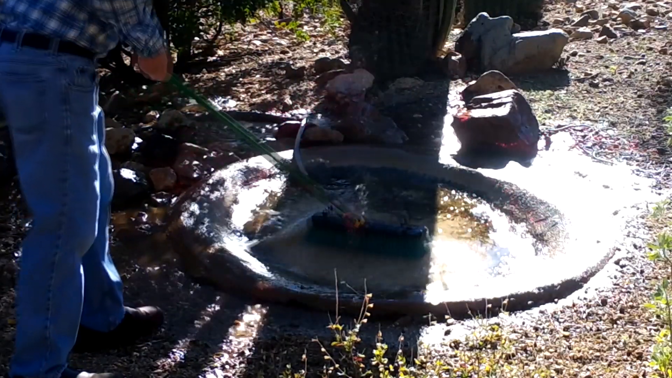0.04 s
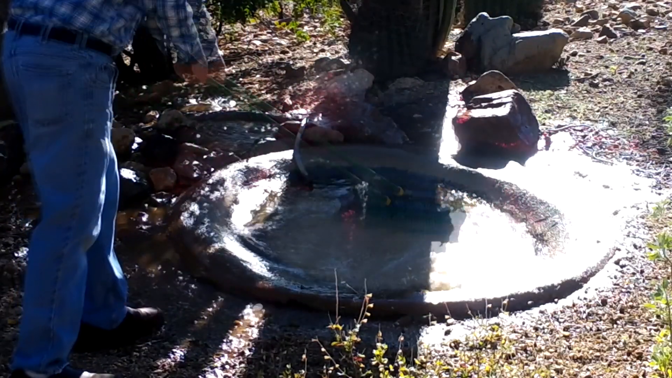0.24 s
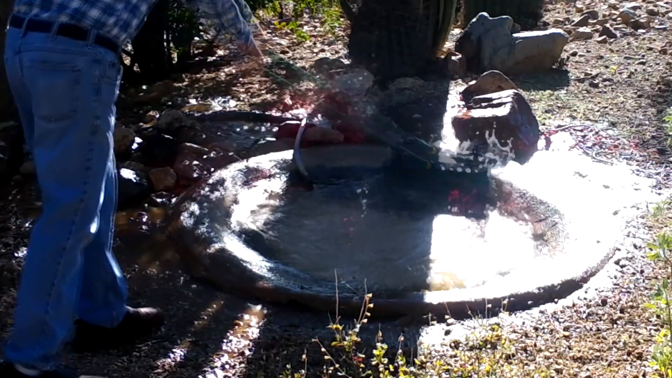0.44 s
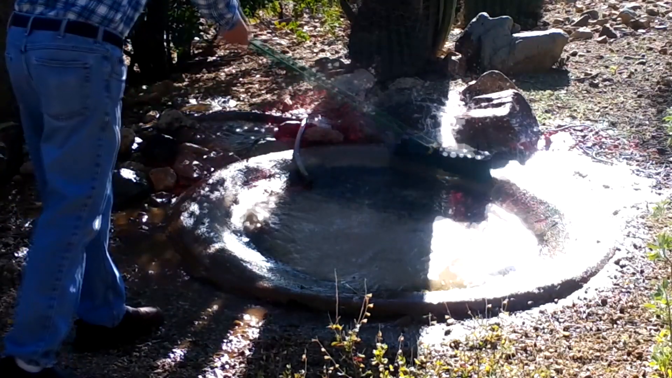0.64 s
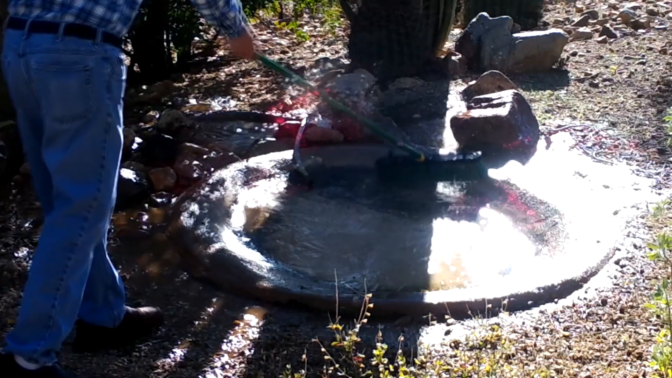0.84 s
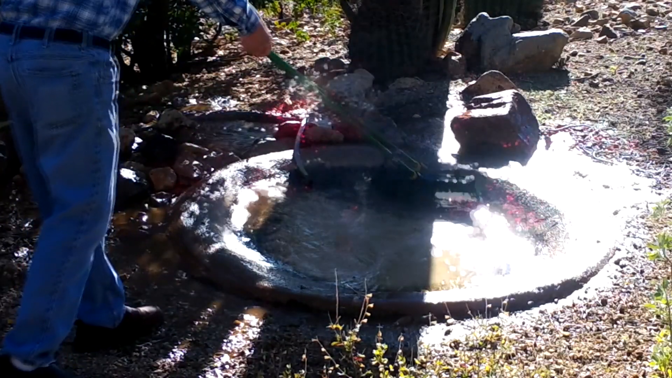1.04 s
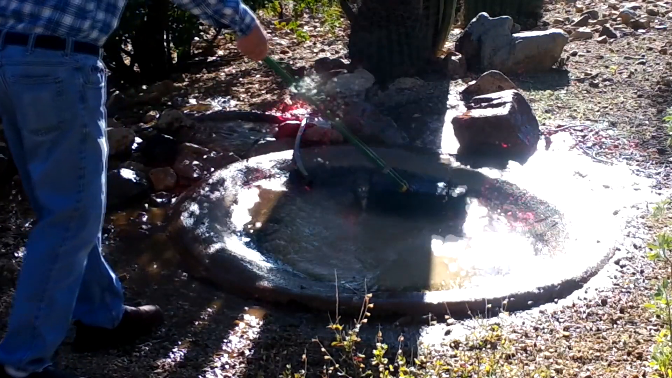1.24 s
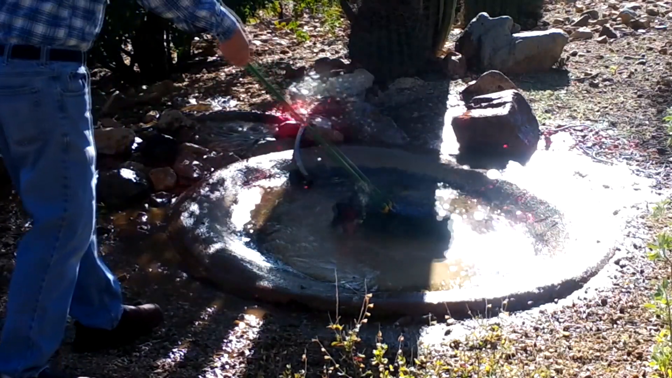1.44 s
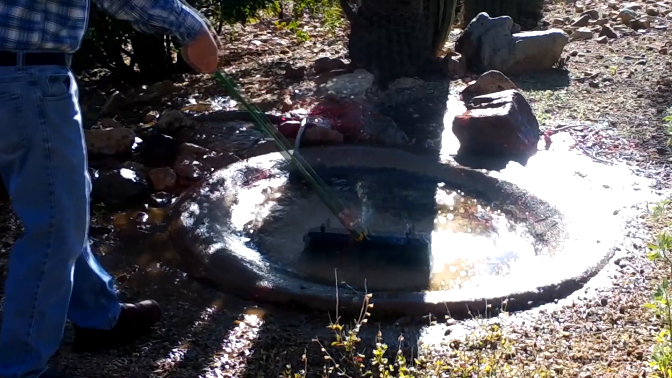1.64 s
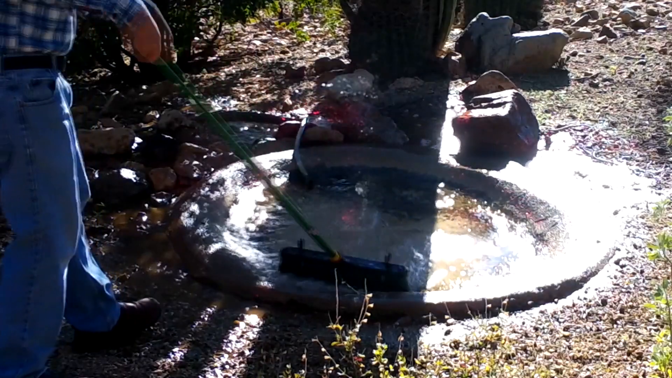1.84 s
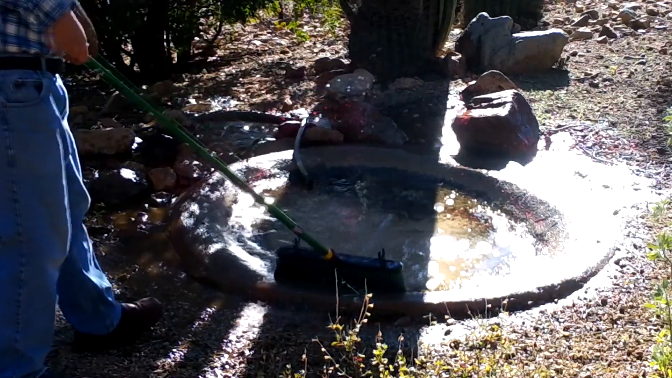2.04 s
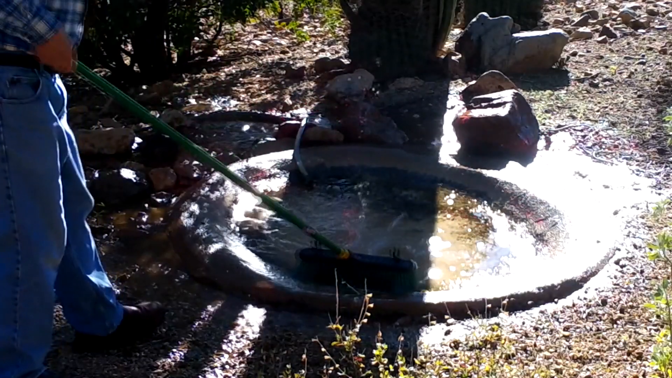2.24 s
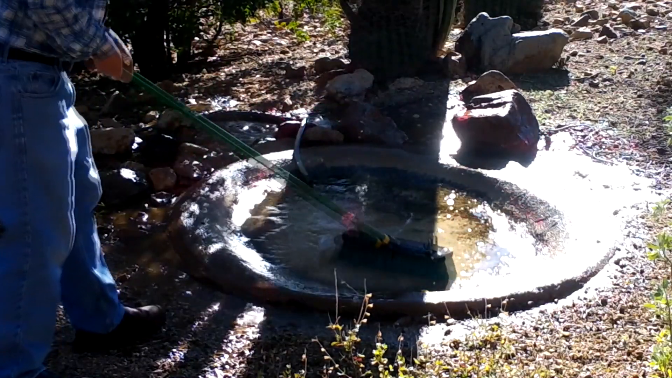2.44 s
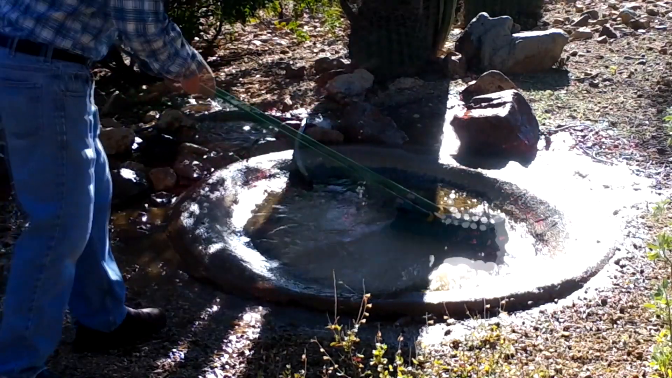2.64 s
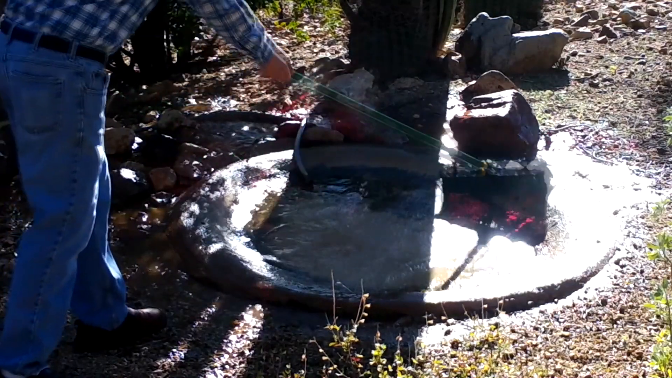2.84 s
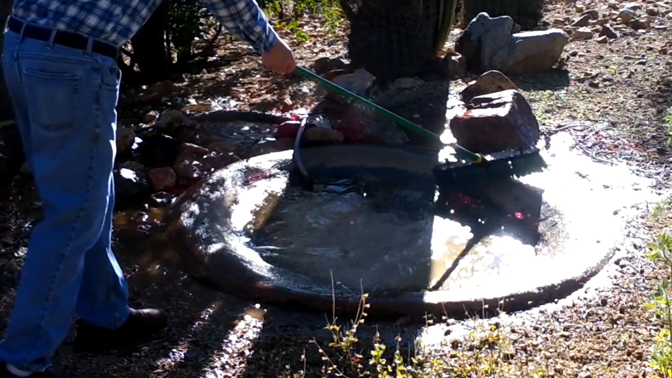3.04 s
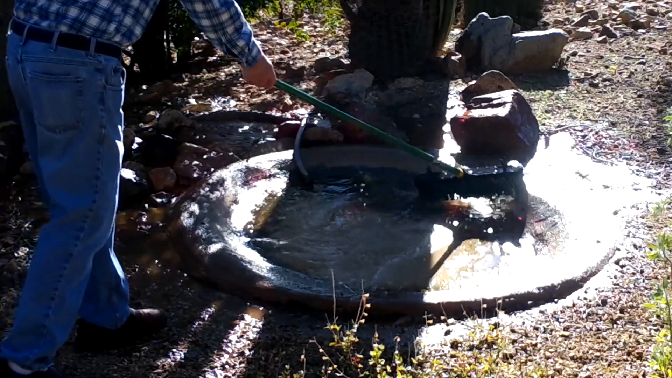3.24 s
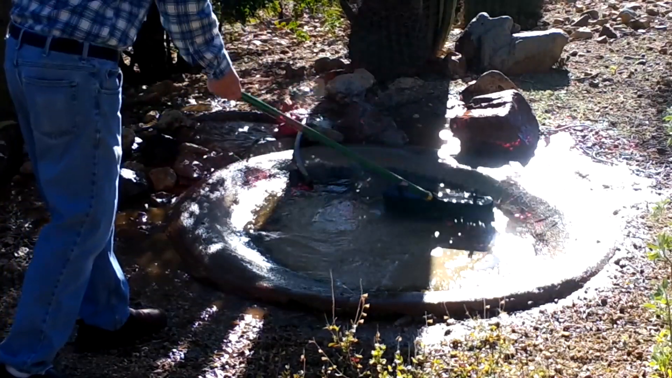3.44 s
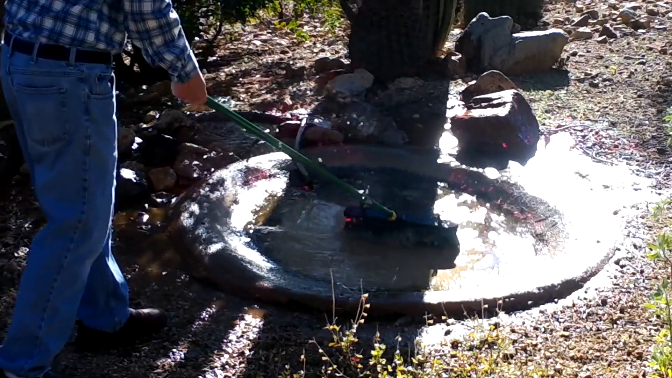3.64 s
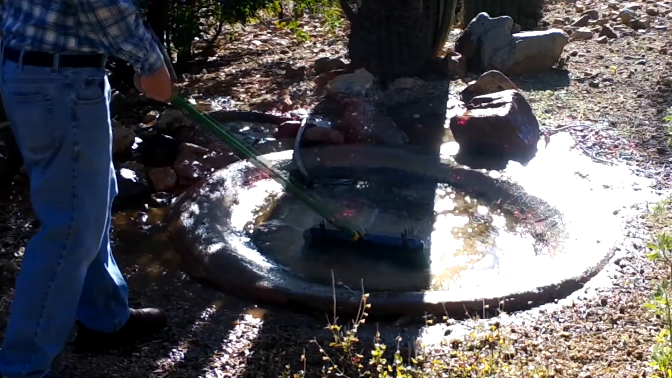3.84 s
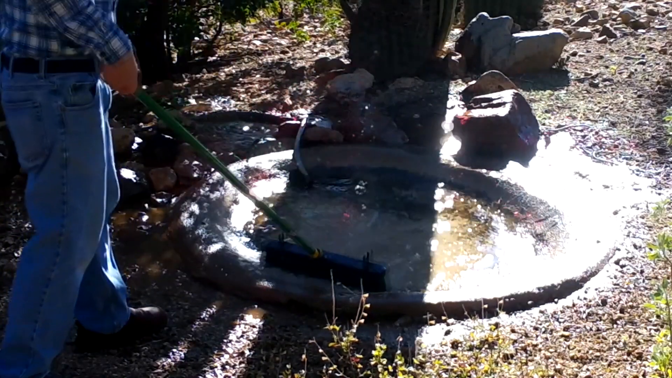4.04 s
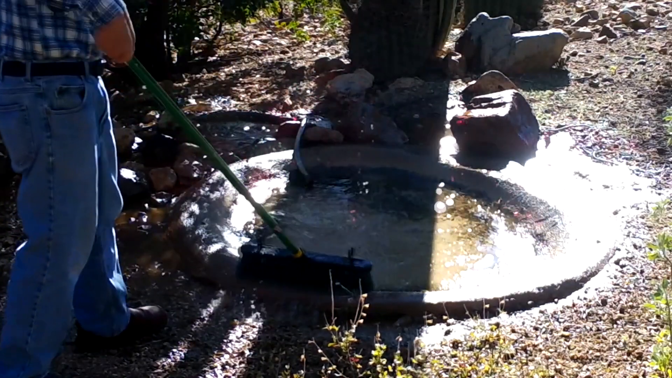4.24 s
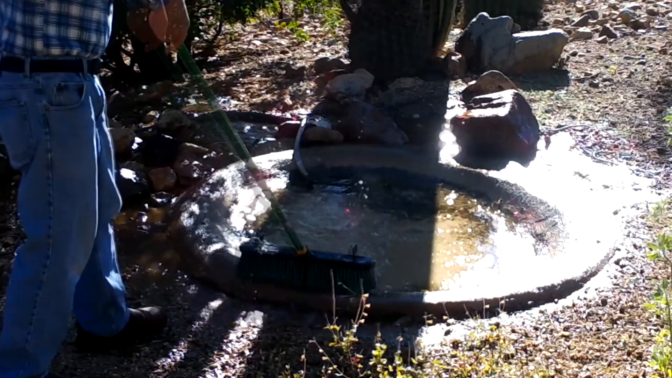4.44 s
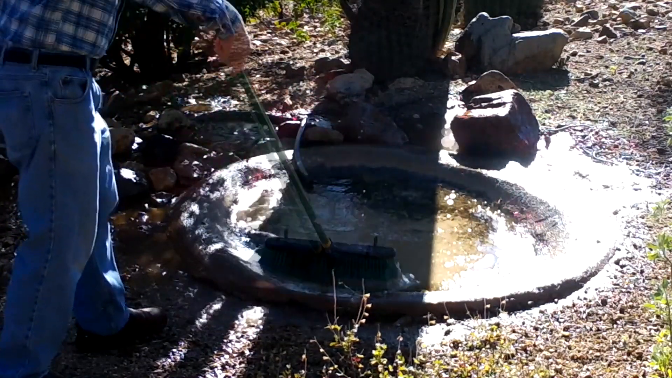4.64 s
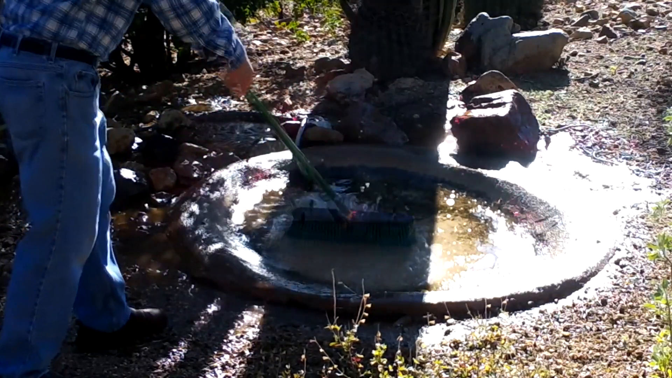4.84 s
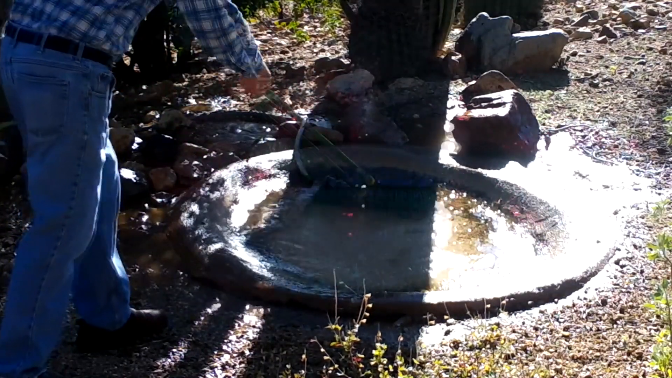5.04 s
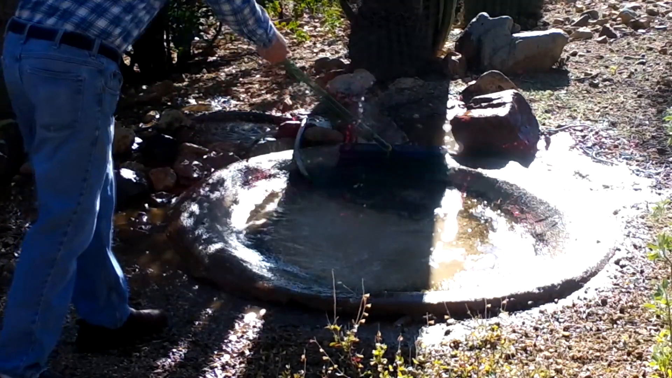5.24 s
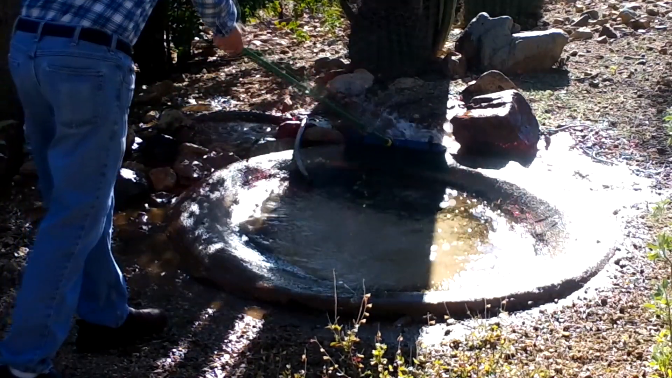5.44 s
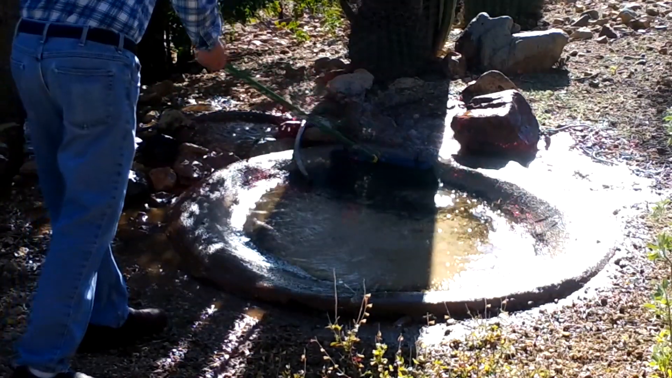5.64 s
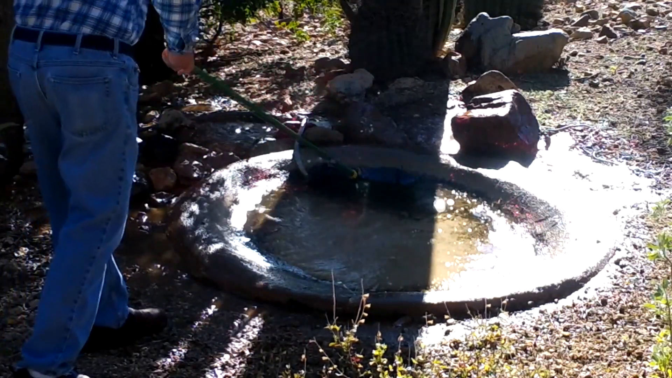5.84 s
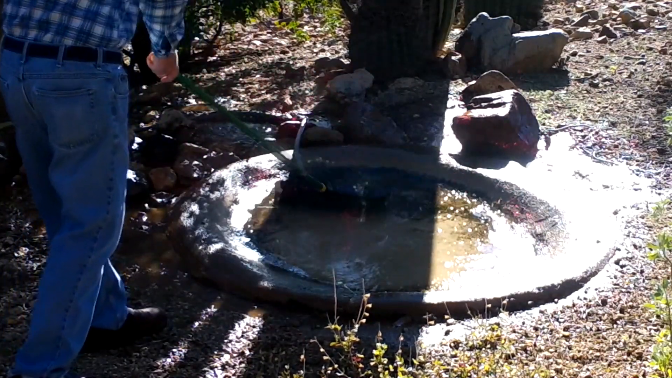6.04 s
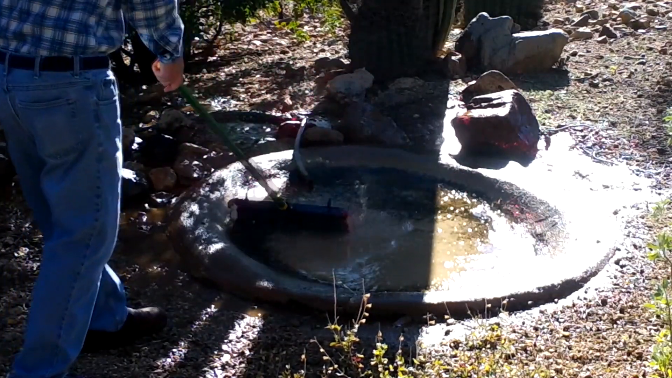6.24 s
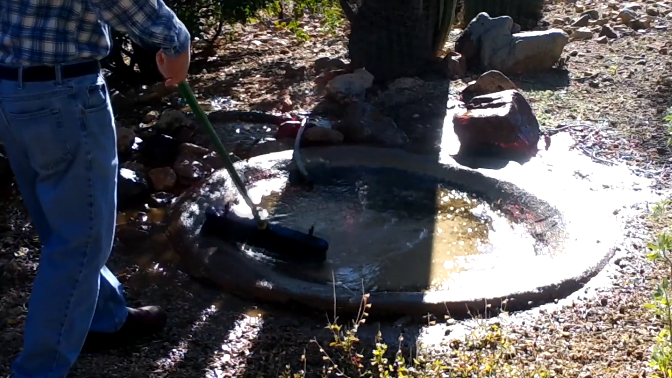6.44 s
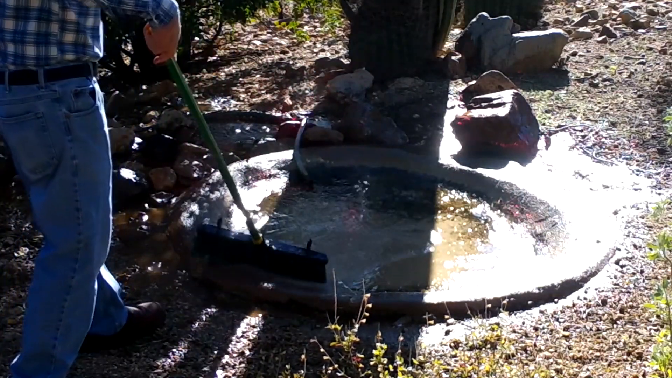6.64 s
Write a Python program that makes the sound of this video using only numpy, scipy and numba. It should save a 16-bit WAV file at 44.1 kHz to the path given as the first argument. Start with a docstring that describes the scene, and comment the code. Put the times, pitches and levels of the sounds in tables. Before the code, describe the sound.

Stiff bristles scrub a wet concrete basin in uneven pushes and light dabs, water spraying, gurgling and dripping between strokes.

```python
"""A stiff broom pushed and dragged through shallow water in an outdoor concrete basin, heard close.
Its bristles catch and slip on the wet concrete in four long pushes, with short dabs in between.
The pushed water sprays and gurgles as crowds of ringing bubbles; drops fall back, plink and tick.
A light breeze rumbles on the small microphone, which favours the treble; the yard behind is quiet."""
import sys
import numpy as np
from scipy import signal
from scipy.fft import rfft, irfft, next_fast_len
from scipy.io import wavfile
from numba import njit

SR = 44100
rng = np.random.default_rng(int(sys.argv[2]) if len(sys.argv) > 2 else 0)


def master_out(mix):
    """Clip the mix to full scale and print it as 16-bit PCM to the path in sys.argv[1]."""
    frames = np.transpose(np.atleast_2d(mix))
    ceiling = np.clip(frames, -1, 1)
    pcm = np.round(ceiling * 32767).astype(np.int16)
    wavfile.write(sys.argv[1], SR, pcm)


N = 295934


def broom(scratch_db, scratch_hz, clumps_db, force):
    """Bristles scratch the wet concrete; tiny bubbles burst among them, clearest at a light touch."""
    # spectrum of the scratch: f/Hz, level/dB
    spectrum = [(2000, -45), (3500, -17), (4800, -7), (5600, -2.5), (6800, -3), (7500, -5.5), (8700, -4.5),
                (10400, -17.5), (15700, -46)]
    scratch = bristles(spectrum, clumps_db, per_s=3000, spread_db=0.5, hiss=0.65 + 0.46 * force)
    fizz = bubbles(spectrum[1:-1], count=7000, cycles=7.5, spread_db=3.9, rise=0.027,
                   wash=.1, patchy_db=1.5)
    scratch = scratch + fizz * 0.69 / (1 + .8 * force)
    return from_db(scratch_db) * emphasis(scratch, scratch_hz, sharpness=3.6, boost_db=4.5)


def bristles(spectrum, clumps_db, per_s, spread_db, hiss):
    """Thousands of tips catch and slip in clumps, over the hiss of the water film."""
    sizes = from_db(spread_db * np.minimum(rng.exponential(1, N), 4.3)) * rng.choice([-1, 1], N)
    contacts = sizes * (rng.random(N) < per_s / SR)
    slips = (rms_one(contacts) + hiss * rng.standard_normal(N)) / np.sqrt(1 + hiss ** 2)
    return coloured(slips * from_db(clumps_db), spectrum)


def strokes():
    """Pushes, dabs and trickle add up to scratch, spray and gurgle levels and steer two pitches."""
    # long pushes, one table each: t/s, scratch/dB, spray/dB, gurgle/dB, gurgle f/Hz
    pushes = [
        [(0.0, -42, -45.5, -51, 1530), (0.15, -41.5, -44, -48.5, 1350), (0.3, -43, -47.5, -53.5, 1540),
         (0.41, -37.5, -41, -50.5, 1600), (0.58, -40, -45.5, -51.5, 1970), (0.63, -49.5, -52, -62, 1950),
         (0.7, -50, -52, -61, 1500), (0.78, -47.5, -51.5, -52, 1100), (1.05, -64, -69, -76, 1400)],
        [(2.3, -66, -78, -90, 1300), (2.37, -46, -56, -79, 1560), (2.45, -42, -47.5, -53.5, 1510),
         (2.49, -36.5, -44.5, -48.5, 1470), (2.58, -38, -43, -48.5, 1680), (2.63, -35.5, -40.5, -50.5, 1620),
         (2.8, -36, -40, -50, 1800), (2.9, -32.5, -38.5, -43, 1820), (2.93, -24.5, -34.5, -36.5, 1820),
         (2.97, -27, -34, -41, 1800), (3.06, -62, -60, -75, 1900)],
        [(4.57, -72, -82, -85, 1320), (4.62, -38.5, -58, -70, 1630), (4.67, -32, -46, -69, 2090),
         (4.75, -29, -38.5, -58, 1850), (4.86, -31.5, -35.5, -40.5, 1440), (4.91, -36, -39, -47.5, 1380),
         (4.99, -38.5, -41.5, -44, 1420), (5.06, -39, -41.5, -48, 1420), (5.21, -40.5, -41.5, -50, 1560),
         (5.38, -46.5, -52, -58, 1840), (5.43, -60, -62, -66, 1520)],
        [(6.36, -64, -70, -72, 1260), (6.41, -47, -57, -67, 1700), (6.48, -47.5, -54, -63, 1000),
         (6.52, -44.5, -53, -81, 1940), (6.62, -30.5, -40.5, -55, 2120), (6.65, -32, -40.5, -59.5, 1940),
         (6.71, -43, -53, -68, 1650)],
    ]
    # dabs and splashes as the broom is drawn back:
    # peak t/s, scratch/dB, spray/dB, gurgle/dB, scratch f/Hz, 10 dB rise/s, 10 dB fall/s
    splashes = [(0.667, -41.5, -54, -55, 6300, .025, .02), (0.93, -56, -62, -70, 6300, .01, .02),
                (1.06, -57, -68, -80, 6900, .04, .01), (1.155, -57.5, -69, -85, 7400, .02, .025),
                (1.21, -57, -66, -85, 7200, .04, .05), (1.34, -61, -70, -72, 6600, .03, .03),
                (1.72, -49, -55, -57, 6750, .05, .05), (1.925, -42.5, -53, -63, 6750, .09, .1),
                (2.075, -45, -50.5, -55, 6900, .02, .08), (3.145, -51.5, -54, -68, 6900, .045, .08),
                (3.19, -48, -55, -62, 6500, .04, .02), (3.232, -46.5, -53, -60, 6000, .02, .035),
                (3.305, -52, -74, -80, 7600, .01, .025), (3.345, -43.5, -75, -71, 7000, .025, .045),
                (3.465, -48.5, -70, -72, 8500, .07, .04), (3.505, -53, -61, -66, 6300, .02, .04),
                (3.7, -58, -61, -74, 7000, .02, .025), (3.77, -62, -56, -66, 6000, .04, .05),
                (3.83, -48.5, -60, -56, 6400, .05, .1), (3.885, -52, -52, -60, 6000, .05, .025),
                (3.96, -51.5, -62, -60, 6300, .04, .05), (4.13, -45.5, -58, -63, 7100, .045, .1),
                (4.289, -47.5, -54, -58, 7000, .003, .12), (4.355, -43.5, -51, -54, 6700, .06, .075),
                (5.46, -52, -49.5, -61, 5900, .04, .1), (5.76, -56, -66, -74, 7600, .07, .07),
                (6.03, -59, -68, -72, 6400, .04, .06), (6.22, -59, -70, -70, 7300, .08, .04)]
    # water running back between strokes: t/s, scratch/dB, spray/dB, gurgle/dB
    trickle = [(0.9, -62, -68, -76), (1.1, -62, -70, -76), (1.36, -65, -71.5, -73), (1.52, -58, -62, -60),
               (1.66, -58, -59, -60), (1.8, -58, -66, -64), (2.24, -67, -67, -69), (2.32, -66, -76, -88),
               (3.1, -60, -66, -71), (3.4, -62, -78, -88), (3.56, -65, -67, -68), (3.62, -60.5, -68, -69),
               (3.7, -61, -68, -68), (4.05, -58, -63, -59.5), (4.27, -58.5, -70, -77),
               (4.55, -73, -80, -84), (5.5, -58, -59, -60), (5.7, -61, -65, -69), (5.87, -60, -66.5, -75),
               (6.3, -60, -65, -66)]
    t = np.arange(N) / SR
    power = from_db(2 * np.array(in_time(trickle)))
    gurgle_hz = 1350 * 2 ** (0.35 * drift(8))   # wanders between pushes
    for push in pushes:
        *level_db, hz = in_time(push)
        moving = (t >= push[0][0]) & (t <= push[-1][0])
        power += moving * from_db(2 * np.array(level_db))
        gurgle_hz[moving] = hz[moving]
    dryness_db = 10 * np.log10(power[0] / power[1])   # scratch over spray
    steady_hz = 6200 + 22 * dryness_db   # a dry push is brighter
    _, *peak_db, splash_hz, _, _ = np.transpose(splashes)
    peaks, shapes = from_db(2 * np.array(peak_db)), swells(splashes)
    total = power + peaks @ shapes
    scratch_hz = (power[0] * steady_hz + (peaks[0] * splash_hz) @ shapes) / total[0]
    return *(10 * np.log10(total)), scratch_hz, gurgle_hz


def mist(scratch_db, scratch_hz, clumps_db):
    """Fine mist hisses off the bristles; a loud or bright touch throws more."""
    # spectrum of the mist: f/Hz, level/dB
    spectrum = [(7000, -7), (10000, -6), (11000, -5), (13000, -6), (15600, -12)]
    level_db = -66.3 + 0.85 * (scratch_db + 45) + 3.5 * (scratch_hz / 1000 - 6.4)
    gain = np.hypot(from_db(level_db), from_db(-79))   # a faint floor remains
    return gain * bristles(spectrum, clumps_db, per_s=1900, spread_db=2.5, hiss=0.95)


def spray(level_db, force):
    """Water sprays between the bristles: small bubbles in a wash that grows with the force."""
    # spectrum of the spray: f/Hz, level/dB
    spectrum = [(1200, -13), (2300, -9.5), (3000, -7), (3600, -3.5), (4300, -1.5), (5200, -4.5),
                (6500, -20.5), (10000, -43)]
    crowd = bubbles(spectrum, count=14000, cycles=7.4, spread_db=2.5, rise=0.049,
                    wash=1.05 + 1.14 * force, patchy_db=0.55)
    rasp_hz = np.full(N, 3900.)
    return from_db(level_db) * emphasis(crowd, rasp_hz, sharpness=4.5, boost_db=1.2)


def gurgle(level_db, hz, force):
    """Larger bubbles ring in the pushed water, under a resonance that moves with the stroke."""
    # spectrum of the gurgle: f/Hz, level/dB
    spectrum = [(350, -30), (600, -9.5), (850, -3), (1450, -3), (1900, -2), (2600, 0), (5000, -34)]
    crowd = bubbles(spectrum, count=6000, cycles=4.7, spread_db=2.5, rise=0.069,
                    wash=1.5 + 0.72 * force, patchy_db=1.2)
    return from_db(level_db) * emphasis(crowd, hz, sharpness=3.8, boost_db=6.5)


def bubbles(spectrum, count, cycles, spread_db, rise, wash, patchy_db):
    """Bubbles of all sizes climb in pitch as they near the surface, over the wash of moving water."""
    when, size, strength, life = rng.random((count, 4)).T
    low_hz, high_hz = spectrum[1][0], spectrum[-2][0]
    hz = low_hz * (high_hz / low_hz) ** size
    height = from_db(-spread_db * np.log(np.maximum(strength, .004))) * np.sqrt(hz)
    length_s = cycles * (.5 + life) / hz
    ringing = rings((when * N).astype(np.int64), hz, height, length_s, np.full(count, rise))
    crowd = (rms_one(ringing) + wash * rng.standard_normal(N)) / np.sqrt(1 + wash ** 2)
    return coloured(crowd * from_db(patchy_db * drift(20)), spectrum)


def drops():
    """Single drops and bubbles plink above the wash."""
    # plinks: t/s, f/Hz, peak level/dB, length/ms
    plinks = [(0.518, 520, -52.5, 7.2), (0.665, 1430, -45, 2.0), (0.668, 3180, -43, 2),
              (0.897, 1560, -41.5, 1.8), (1.34, 930, -53.5, 9.2), (1.462, 3860, -47, 1.1),
              (1.488, 1300, -49, 2.7), (1.494, 5930, -32.5, 1.1), (1.506, 5070, -42, 1.2),
              (1.517, 3280, -43.5, 1.4), (1.584, 5930, -40.5, 1.1), (1.643, 3800, -37.5, 2.7),
              (1.664, 1510, -45, 2.4), (1.703, 6480, -36, .8), (1.782, 6960, -35, .88),
              (2.056, 7400, -35, 1.3), (2.073, 9370, -39, .5), (2.103, 4000, -35, .8),
              (2.111, 2600, -41, 1.2), (2.121, 6400, -35, .7), (2.17, 5240, -40, 2), (3.184, 6400, -34, .7),
              (3.235, 5370, -27, .6), (3.241, 6060, -35, 1.4), (3.305, 7600, -38, 3.5),
              (3.334, 8000, -32, .49), (3.348, 6890, -30, 1.07), (3.483, 8800, -37, .8),
              (3.568, 2600, -50, 4), (3.66, 4440, -49, 1.5), (3.696, 6700, -33.5, .91),
              (3.75, 3500, -48, 2.8), (3.754, 1410, -46, 2.2), (3.795, 5170, -37.5, 1.1),
              (3.823, 6800, -29, .56), (3.872, 1180, -51, 7.4), (3.886, 6000, -35, .53),
              (3.955, 6540, -35, .5), (4.049, 6400, -40, 1.9), (4.055, 4410, -45, 1.2),
              (4.068, 830, -50.5, 4.7), (4.124, 8200, -36, .44), (4.134, 1110, -50, 2.7),
              (4.19, 1200, -53, 3.0), (4.318, 1630, -49, 3.9), (4.356, 6940, -29, .7),
              (4.43, 4000, -42, 1.1), (4.47, 7170, -37, .7), (5.485, 5650, -39, 1.6),
              (5.613, 4450, -43.5, 2.4), (5.631, 780, -54, 4.5), (5.708, 1520, -51, 3.0),
              (5.905, 3580, -50, 2.2), (6.326, 1330, -51, 3.7), (6.469, 830, -54, 4.7)]
    s, hz, peak_db, ms = np.transpose(plinks)
    rise = 0.081 * np.minimum(2600 / hz, 1)   # large bubbles climb most
    start = ((s - ms / 8000) * SR).astype(np.int64)
    return rings(start, hz / (1 + rise), from_db(peak_db), ms / 1000, rise)


def ticks():
    """Drops burst on bare concrete: a sharp crack with a millisecond of spatter."""
    # impacts: t/s, relative level/dB
    impacts = [(0.665, -21), (0.7148, -26), (0.7595, -29), (1.6626, -29), (2.057, -33), (3.1827, -31),
               (3.2347, -23), (3.695, -26.5), (4.2867, -31), (4.469, -28.5), (4.6034, -34)]
    out, tail = np.zeros(N), np.exp(-np.arange(300) / (0.00098 * SR))
    for s, level_db in impacts:
        at = round(s * SR)
        out[at:at + 300] += from_db(level_db - 5.5) * tail * rng.standard_normal(300)
    return signal.sosfilt(signal.butter(4, [2800, 9300], "band", fs=SR, output="sos"), out)


def breeze():
    """Lumpy low turbulence at the microphone, with a few thumps."""
    # gusts: peak t/s, level/dB, 10 dB rise/s, 10 dB fall/s
    gusts = [(0.09, -55, .1, .05), (0.19, -54.5, .1, .07), (0.66, -56, .3, .06), (0.99, -64, .15, .1),
             (1.12, -61, .04, .07), (2.0, -58.5, .09, .08), (2.13, -58.5, .09, .18), (2.5, -66, .2, .07),
             (3.46, -58, .1, .06), (3.57, -63.5, .04, .05), (4.39, -54.5, .07, .04), (4.5, -56, .035, .04),
             (4.84, -55, .045, .06), (5.0, -66, .15, .06), (5.1, -65, .05, .15), (5.68, -60, .1, .04),
             (6.31, -61, .06, .12), (6.54, -61, .05, .03)]
    # spectrum of the rumble: f/Hz, level/dB
    spectrum = [(20, 0), (35, -4), (70, 0), (120, -2), (200, -7.5), (350, -21), (900, -70)]
    # gusts that thump the microphone: t/s, peak level/dB, f/Hz
    buffets = [(5.648, -53, 90), (5.692, -46, 175), (6.527, -49.5, 290), (6.535, -50, 130)]
    calm_db = -77
    gain = np.sqrt(from_db(2 * calm_db) + from_db(2 * np.transpose(gusts)[1]) @ swells(gusts))
    rumble = gain * coloured(rng.standard_normal(N) * from_db(3.1 * drift(18)), spectrum)
    s, peak_db, hz = np.transpose(buffets)
    thumps = rings((s * SR).astype(np.int64), hz, from_db(peak_db), 1.8 / hz, np.full(len(s), -.05))
    return rumble + thumps


def yard():
    """The faint, steady hush of the open air around the basin."""
    # spectrum of the hush: f/Hz, level/dB
    spectrum = [(15, -31), (25, 1), (104, 6.5), (649, 4), (2700, -5), (3010, -11), (4160, -11.5),
                (6750, -8), (8610, -5), (10400, -11), (15600, -33)]
    return from_db(-64) * coloured(rng.standard_normal(N), spectrum)


@njit
def rings(start, hz, height, length_s, rise):
    """Short tones that swell, die away and glide by the fraction `rise` per length."""
    out = np.zeros(N)
    for k in range(len(start)):
        phase = 0.
        for i in range(min(int(4 * length_s[k] * SR), N - start[k])):
            age = i / SR / length_s[k]
            phase += 2 * np.pi * hz[k] * (1 + rise[k] * age) / SR
            out[start[k] + i] += height[k] * np.e * 2 * age * np.exp(-2 * age) * np.sin(phase)
    return out


def emphasis(x, hz, sharpness, boost_db):
    """A broad resonance that follows `hz` lifts part of the spectrum; rms 1."""
    lifted, state = np.zeros(N), np.zeros(2)
    for i in range(0, N, 256):
        r = np.exp(-np.pi * hz[i] / sharpness / SR)
        b = [(1 - r * r) / 2, 0, (r * r - 1) / 2]
        a = [1, -2 * r * np.cos(2 * np.pi * hz[i] / SR), r * r]
        lifted[i:i + 256], state = signal.lfilter(b, a, x[i:i + 256], zi=state)
    return rms_one(x + (from_db(boost_db) - 1) * lifted)


def coloured(x, spectrum):
    """Gives a flat sound the shape of this spectrum; rms 1."""
    size = next_fast_len(N)
    hz = np.arange(size // 2 + 1) * SR / size + 1
    point_hz, point_db = np.transpose(spectrum)
    gain = from_db(np.interp(np.log(hz), np.log(point_hz), point_db, left=-90))
    return rms_one(irfft(rfft(x, size) * gain, size)[:N])


def drift(rate_hz):
    """Slow random wander: noise through a double one-pole low-pass; spread 1."""
    r = np.exp(-40 * np.pi * rate_hz / SR)   # one step per 20 samples
    slow = signal.lfilter([1], [1, -2 * r, r * r], rng.standard_normal(N // 20 + 2002))[2000:]
    return np.interp(np.arange(N) / 20, np.arange(len(slow)), rms_one(slow))


def swells(rows):
    """Power shape of each event: up to its peak and down again, straight in decibels."""
    t = np.arange(N) / SR
    return np.array([10 ** np.minimum((t - s) / rise, (s - t) / fall) for s, *_, rise, fall in rows])


def in_time(rows):
    """Each column of a curve table, sample by sample."""
    s, *columns = np.transpose(rows)
    return [np.interp(np.arange(N) / SR, s, column) for column in columns]


def from_db(db):
    """Decibels to gain."""
    return 10 ** (np.asarray(db) / 20)


def rms_one(x):
    """Scaled to unit power."""
    return x / np.sqrt(np.mean(x ** 2) + 1e-20)


def scene():
    """Broom and water in front, breeze on the microphone, the yard behind; mono."""
    scratch_db, spray_db, gurgle_db, scratch_hz, gurgle_hz = strokes()
    force = from_db(scratch_db + 45.5)   # hard strokes blend single grains into a smooth swish
    clumps_db = 1.02 * drift(28) + 0.68 * drift(120)
    clumps_db *= 1 + 0.8 / (1 + force ** 2)   # a light touch is more uneven
    sweeping = broom(scratch_db, scratch_hz, clumps_db, force) + mist(scratch_db, scratch_hz, clumps_db)
    water = spray(spray_db, force) + gurgle(gurgle_db, gurgle_hz, force) + drops() + ticks()
    return (sweeping + water + breeze() + yard())[None]


def record(dry):
    """The small microphone's housing colours the treble; the top is cut steeply."""
    # peaks and dips of the housing: f/Hz, width/Hz, gain/dB
    housing = [(2980, 210, -0.5), (3690, 1170, 1.5), (4710, 330, -2), (5660, 210, 0.5), (6850, 200, 2),
               (7300, 870, -1), (8140, 2400, 1.5)]
    size = next_fast_len(N + 4096)
    hz = np.arange(size // 2 + 1) * SR / size
    colour_db = sum(db / (1 + (2 * (hz - centre_hz) / width_hz) ** 2)
                    for centre_hz, width_hz, db in housing)
    heard = irfft(rfft(dry, size) * from_db(colour_db), size)[:, :N]
    cutoff_hz = 15694
    return signal.sosfilt(signal.ellip(14, .3, 75, cutoff_hz, fs=SR, output="sos"), heard)


dry = scene()
out = record(dry)
master_out(out)
```